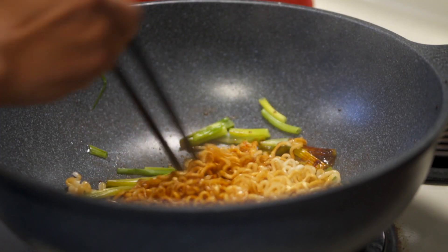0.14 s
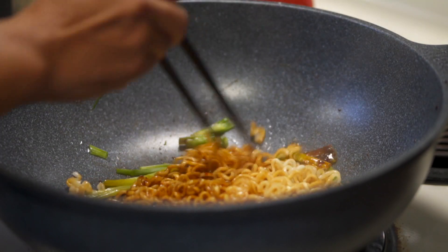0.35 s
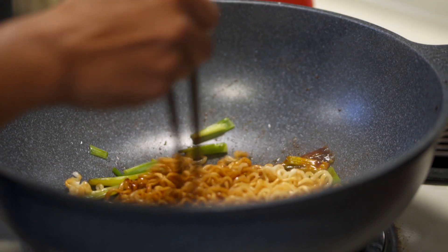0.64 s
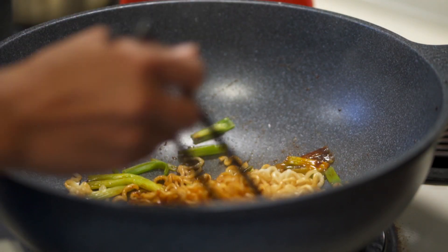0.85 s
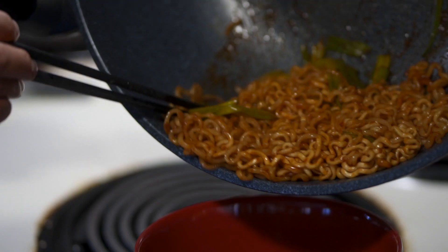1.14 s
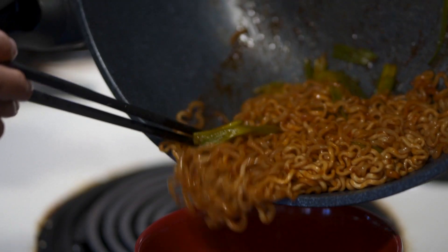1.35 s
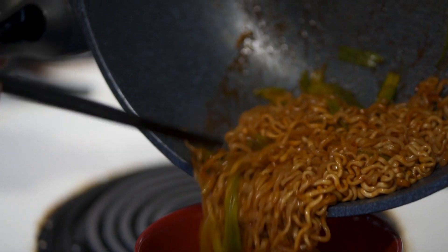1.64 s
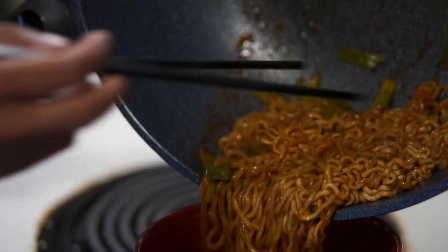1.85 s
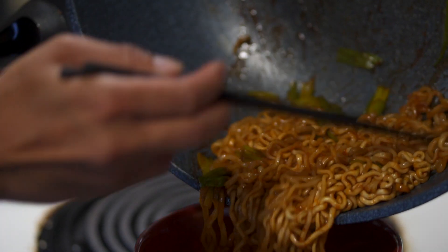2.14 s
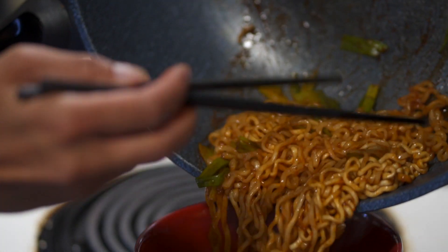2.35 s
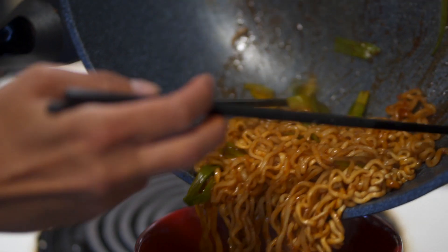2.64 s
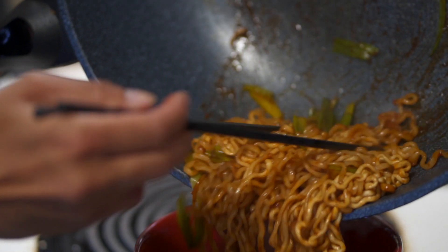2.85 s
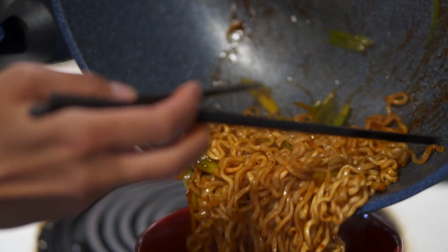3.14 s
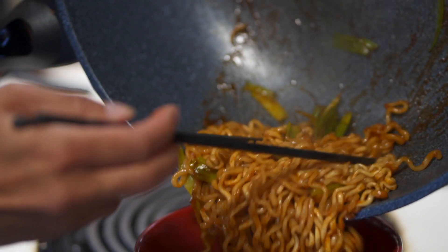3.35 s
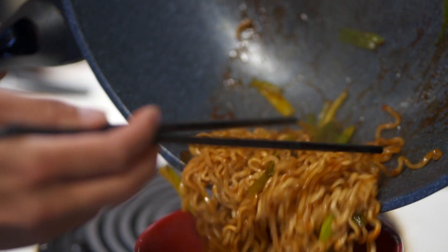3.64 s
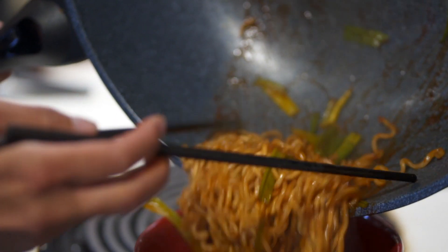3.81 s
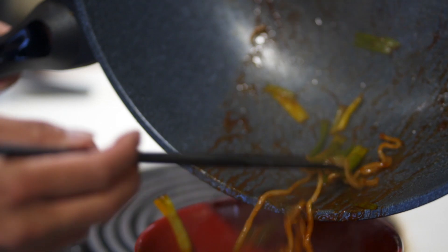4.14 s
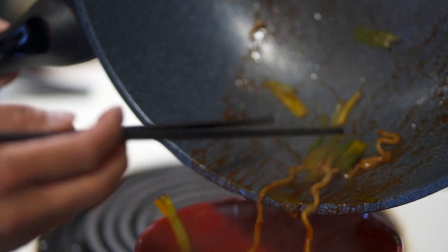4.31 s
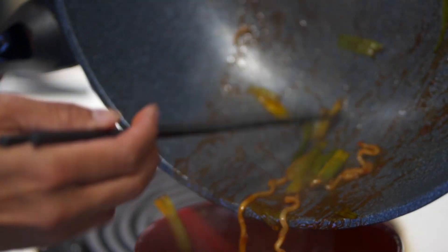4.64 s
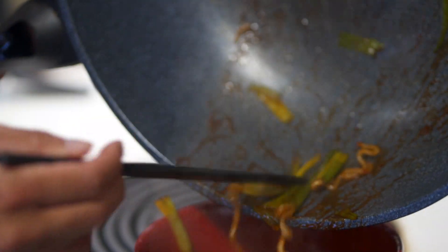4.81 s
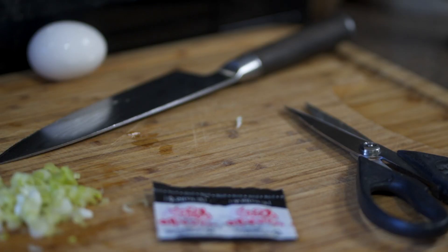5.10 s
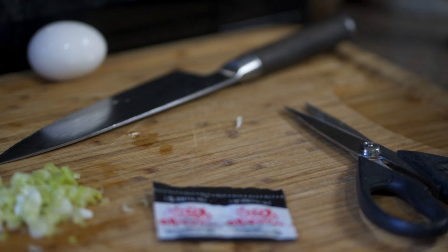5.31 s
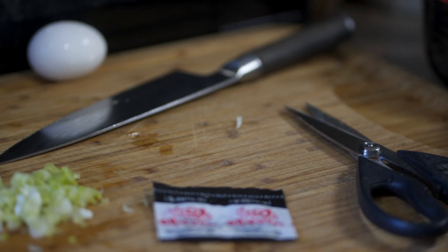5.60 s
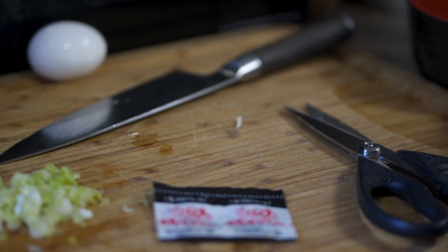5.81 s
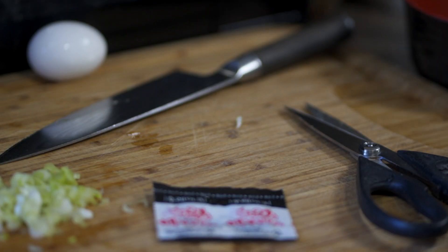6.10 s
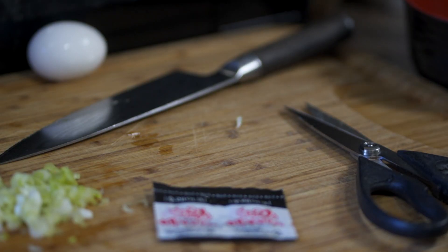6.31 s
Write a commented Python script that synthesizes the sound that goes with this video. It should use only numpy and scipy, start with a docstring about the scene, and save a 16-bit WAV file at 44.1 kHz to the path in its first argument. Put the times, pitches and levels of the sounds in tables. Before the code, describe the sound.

Close in a home kitchen, chopsticks clack sharply and scrape through wet noodles in a coated wok over a thin spitting sizzle. A hard cut drops the hiss; spaced taps and gritty drags ring more freely on the bare pan. Another cut leaves soft cloth brushes, then a bowl knocks and slides briefly on a wooden board. Low hum throughout; the loudest taps distort.

```python
"""Home kitchen: chopsticks tap and scrape a coated wok of noodles, in three parts joined by hard cuts.
Stirring over the heat: spitting hiss, and struck and rubbed pan modes damped by the food.
Tipping the food out: the same pan rings more freely. Then a bowl is set down and slid on a wooden board,
its knocks and grit driving board and rim modes, with soft brushes of hands and cloth.
Room air and a wavering fridge hum lie beneath; loud taps clip the microphone."""
import sys
import numpy as np
from scipy import signal
from scipy.fft import rfft, irfft, next_fast_len
from scipy.io import wavfile
from scipy.ndimage import uniform_filter1d

SR = 44100
rng = np.random.default_rng(int(sys.argv[2]) if len(sys.argv) > 2 else 0)


def master_out(mix):
    """Clip the mix to full scale and print it as 16-bit PCM to the path in sys.argv[1]."""
    frames = np.transpose(np.atleast_2d(mix))
    ceiling = np.clip(frames, -1, 1)
    pcm = np.round(ceiling * 32767).astype(np.int16)
    wavfile.write(sys.argv[1], SR, pcm)


def invert_db(x):
    """Field ratio 10**(x/20) for x, a level in decibels (scalar or array-like)."""
    u = np.asarray(x, float) / 20
    return 10 ** u


N = 284886
T = np.arange(N) / SR

# Bounds of the three parts. Each entry: time in seconds.
CUTS_S = [0, 1.135, 4.931, 7]

# Chopstick taps on the wok. Each row: start in seconds, relative level in dB, favoured mode in Hz,
# share under 1.5 kHz in dB.
WOK_TAPS = [(0.149, -12.5, 5240, -38), (0.1586, 2.5, 5770, -50), (0.182, -12, 3820, -29),
            (0.318, -29, 3040, -9), (0.376, -0.5, 5380, -11.5), (0.426, -8, 3100, -11.5),
            (0.4887, -22.5, 2374, 2), (0.5288, -15, 5350, -12), (0.681, 3.5, 6285, -19.5),
            (0.8162, -18, 9300, -6), (0.9331, 0, 3900, -13.5), (1.167, -26.5, 6848, -14),
            (1.352, -40, 9722, -28), (1.368, -16, 12440, -14), (1.8212, -30, 9780, -3),
            (1.88, -21.5, 6285, -20.5), (1.9422, -43, 2480, 5.5), (2.1816, -16, 5222, -14.5),
            (2.2036, -18.5, 7260, -15.5), (2.451, -49, 12440, -24.5), (2.5096, -37.5, 6285, -6.5),
            (2.7283, -3, 3040, -24), (3.137, -18.5, 7260, -21), (3.2034, -4, 6285, -21.5),
            (3.2825, -3.5, 3040, -27.5), (3.7668, -13.5, 4290, -17), (3.905, 1, 3820, -22),
            (3.9421, -5.5, 5380, -18), (4.1188, -26.5, 3600, -9), (4.519, -26, 3600, -14),
            (4.663, 1.5, 5900, -22.5), (4.679, -2.5, 5717, -45)]
# Chopsticks dragging on the wok. Each row: start in seconds, length in seconds, fade t60 in seconds,
# relative level in dB, favoured mode in Hz, share under 1.5 kHz in dB.
WOK_SCRAPES = [(0, 0.0094, 0.11, -31, 6540, -6), (0.179, 0.019, 0.22, -12, 3040, -13),
               (0.392, 0.019, 0.038, -21.5, 2070, -0.5), (0.412, 0.025, 0.17, -21, 2374, -5),
               (0.509, 0.02, 0.04, -23, 5717, -3), (0.705, 0.048, 0.13, -10, 2180, -12.5),
               (0.932, 0.037, 0.99, -32.5, 3950, -10.5), (1.16, 0.024, 0.05, -30.5, 8500, -26),
               (1.367, 0.016, 0.07, -37, 6310, -13), (2.172, 0.045, 0.05, -33.5, 10660, -19),
               (2.734, 0.1, 0.1, -21.5, 2480, -15), (2.815, 0.032, 0.065, -30.5, 770, -16.5),
               (3.233, 0.025, 0.11, -26.5, 3600, -6), (3.274, 0.014, 0.22, -24, 2374, -9),
               (3.761, 0.022, 0.11, -18, 5380, -20), (3.967, 0.044, 0.027, -17.5, 1563, -16.5),
               (4.02, 0.055, 0.075, -37, 5380, -21.5), (4.68, 0.04, 0.36, -7, 2374, -18)]
# Modes of the pan. Each row: frequency in Hz, level in dB, undamped t60 in seconds,
# change of level while food lies in it in dB.
WOK_MODES = [(771, -4.5, 0.48, 0), (926, -3.5, .04, 2), (1400, -2.5, 0.25, -3), (1563, -9.5, .12, -1),
             (2125.8, -16, 0.2, 17), (2374, -4, 0.13, -7), (2480, -14, 0.27, -5), (3040, -3, 0.15, 7),
             (3600, -4, 0.14, -6), (3950, -5, 0.22, 8), (3820, -11, 0.1, -15.5), (4410, -9, 0.14, -6),
             (5222, -21, 0.6, 6), (5380, -11.5, 0.1483, 0), (5717, -13, 0.2, 6), (6285, -17.5, 0.12, -1),
             (6848, -18, 0.3, 0), (7267, -17, 0.36, 2.5), (8565, -15, 0.16, -0.5), (9722, -17, .15, -0.5),
             (10750, -14, .11, -3), (11455, -18, .17, -3), (12440, -20, .13, -3)]
# Share of the ring time left by the food. Each entry: ratio, one per part (last unused).
WOK_DAMP_RATIO = [.2, .85, .85]
# Spectrum of a tap's crack. Each row: frequency in Hz, level in dB.
CRACK_SPECTRUM = [(500, -47.5), (900, -25), (2000, -29), (3860, 12.5), (4870, 2.5), (6140, 14), (8090, 4),
                  (11000, 3), (16000, -20)]
# Spectrum of the drag. Each row: frequency in Hz, level in dB.
RUB_SPECTRUM = [(1200, -21.5), (2000, -5), (3500, 6.5), (5400, 4.5), (8000, 8), (11000, -6.5),
                (16000, -36.5)]
# Low noise of taps and drags. Each row: frequency in Hz, level in dB.
LOW_SPECTRUM = [(200, -30.5), (600, -1.5), (1500, -3.0), (2400, -5.5), (3500, -14.5)]
# Scraping heard straight from the tips, more with food to crunch. Each entry: level in dB, wok parts 1 and 2.
TIP_GRIT_DB = [-9, -17]
# Wet food crunches coarsely, the bare coating finely. Each entry: grains per second, wok parts 1 and 2.
GRAIN_RATE_PER_S = [3500, 9000]
# How unevenly a drag bites, wet food then bare pan. Each entry: spread in dB, wok parts 1 and 2.
BITE_DB = [5, 3]
# Where the close upper modes begin, lower while food loads the pan. Each entry: Hz, one per part (last unused).
CROWD_START_HZ = [1500, 4300, 4300]
CROWD_T60_S = .2  # at 5 kHz, before scatter and damping
TICKS_PER_S, TICK_DB, TICK_LOW_DB = 2, -47, -10  # faint stray ticks of the tips; levels scatter round these
LINGER_DB, LINGER_T60_S = -19, 0.82  # food keeps shifting softly after each drag
# the tips rest against the pan and choke its modes between these times
STILLED_START_S, STILLED_END_S, STILLED_T60_S = 4.12, 4.5, .12
SOFT_RISE_S = .002  # build-up of a crack at -20 dB; harder ones rise faster
# lead of the favoured mode on a 0 dB tap, growth per dB of level, level below which there is none
LIFT_DB, LIFT_PER_DB, GLANCING_DB = 6, -.45, -35
WET_TREBLE_DB = -8  # wet food dulls a drag from 5 kHz, fully by 9 kHz

# Frying level. Each row: time in seconds, level in dB.
SIZZLE_LEVEL = [(0, -36), (.35, -36), (.65, -34), (.9, -31), (1.133, -39)]
# Frying spectrum. Each row: frequency in Hz, level in dB.
SIZZLE_SPECTRUM = [(200, -27), (430, -9), (700, -4), (1410, -11), (3130, -4), (7200, -2.5), (10900, -6),
                   (16000, -20)]

# Bowl knocks on the board. Each row: start in seconds, relative level in dB, sharpness in dB,
# favoured mode of the bowl in Hz.
BOWL_KNOCKS = [(5.62, 8.5, -5, 2245), (5.637, 2, -8, 4720), (5.711, -0.5, -29, 2880),
               (5.802, -7.5, -9.5, 3230), (5.857, 1.5, -7.5, 2245), (5.866, -8.5, -19, 3300)]
# Bowl sliding and rocking. Each row: time in seconds, pressure in dB, level of the treble grit in dB.
BOWL_SLIDE = [(5.62, -16.5, -44), (5.66, -13.5, -19.5), (5.726, -16.5, -21), (5.76, -31.5, -29.5),
              (5.82, -11, -26), (5.843, -35, -51), (5.872, -13.5, -36), (5.943, -37.5, -33),
              (6.0, -70, -85)]
# Modes of the board. Each row: frequency in Hz, level in dB, t60 in seconds.
BOARD_MODES = [(81.8, -15, 0.013), (150, -10.5, 0.166), (266, -9, 0.1), (340, 7.5, 0.012), (488, 2, 0.033),
               (608, 1.5, 0.021), (670, -4, 0.086), (733, 4.5, 0.033), (890, -4, 0.038), (1060, -20, 0.039)]
# Modes of the bowl's rim. Each row: frequency in Hz, level in dB, t60 in seconds.
BOWL_MODES = [(2245, -4, 0.03), (2880, -12, 0.08), (3300, 0, 0.04), (4720, -3, 0.04), (5396, -8, 0.08),
              (6370, -13, 0.05)]
THUD_DB = 3.5  # rubbing of the board's modes under 300 Hz against the others

# Hands and cloth near the board. Each row: start in seconds, relative level in dB, low share in dB.
BRUSHES = [(4.9974, -39, -17), (5.1244, -34.5, -13), (5.3043, -38.5, 6.5), (5.4355, -34.5, 8.5),
           (5.4883, -51, 20), (6.129, -31, -23), (6.1994, -34, -17), (6.2994, -37, -6)]
BRUSHES_PER_S, BRUSH_DB, BRUSH_LOW_DB = 5, -42, -15  # fainter ones at random; levels scatter round these

# Dull bumps through stove and counter. Each row: start in seconds, relative level in dB, frequency in Hz.
DULL_BUMPS = [(0.39, -2, 311), (0.431, 2, 150), (0.498, -4.5, 243.4), (5.314, -4, 130), (6.082, -13, 85.4)]

# Room air, one list for the stove side and one for the board side. Each row: frequency in Hz, level in dB.
AIR_SPECTRA = [
    [(15, -48.5), (25, -28.5), (43, -33), (114, -7), (145, -7.5), (223, -9), (242, -9), (384, -11),
     (754, -24.5), (1040, -24), (1840, -33), (5280, -37), (16000, -45)],
    [(15, -48), (25, -12), (80, -3.5), (236, 5), (293, -20.5), (354, -9.5), (1100, -21.5), (1290, -19.5),
     (1520, -24.5), (5280, -25.5), (11300, -32), (16000, -39)],
]
# Mean air level. Each entry: dB, stove side then board side.
AIR_LEVEL_DB = [-47, -43]
# Fridge hum. Each row: frequency in Hz, then mean level in dB in parts 1, 2 and 3.
FRIDGE_HUM = [(58.3, -56, -56, -54.5), (109.8, -54, -54.5, -55), (219.3, -48, -46, -38),
              (328, -69, -63, -58.5), (1034, -63.5, -66.5, -70.5), (3950, -74, -75.5, -72)]
ROOM_T60_S, ROOM_DB = 0.42, -11.5


def wok(k):
    """Taps crack and strike the pan's modes; the drag is grit heard mostly through the pan."""
    taps = wok_taps(k)
    start_s, tap_db, spot_hz, low_db = taps
    size = invert_db(tap_db)
    scrapes = np.array([row for row in WOK_SCRAPES if CUTS_S[k] <= row[0] < CUTS_S[k + 1]]).T
    length_s, t60_s, drag_db, drag_hz, deep_db = scrapes[1:]
    pressure = strokes(scrapes[0], length_s, t60_s) * invert_db(BITE_DB[k] * walk(90))
    rub = wok_rub(k, pressure, drag_db, drag_hz)

    crack = invert_db(-7.5) * cracks(start_s, size, spot_hz)
    thud = invert_db(-6.0) * fade(spikes(start_s, size * invert_db(low_db)), 0.09) * noise(LOW_SPECTRUM)
    low_grit = unit(colour(grit(5400, 0.98), LOW_SPECTRUM))
    low_rub = invert_db(4.0) * low_grit * (invert_db(drag_db + deep_db) @ pressure)
    direct_rub = invert_db(TIP_GRIT_DB[k]) * (colour(rub, RUB_SPECTRUM) + low_rub)
    crowd_drive = invert_db(-56.0) * rub + invert_db(-30.5) * spikes(start_s, size ** 1.33)
    upper_ring = signal.fftconvolve(crowd_drive, crowd(k, count=240))[:N]
    modes = wok_modes(k, taps, pressure, drag_db, drag_hz, deep_db)
    return crack + thud + direct_rub + upper_ring + modes


def wok_taps(k):
    """Columns of the listed taps of this part and of faint ticks anywhere on the pan."""
    at_s, loud, place, deep = strays(CUTS_S[k], CUTS_S[k + 1], TICKS_PER_S)
    tick_db = TICK_DB + 8 * (loud - .5)
    tick_low_db = TICK_LOW_DB - 16 * (deep - .5)
    ticks = np.transpose([at_s, tick_db, 2400 * 4 ** place, tick_low_db])
    listed = [row for row in WOK_TAPS if CUTS_S[k] <= row[0] < CUTS_S[k + 1]]
    return np.vstack([listed, ticks]).T


def cracks(start_s, size, spot_hz):
    """A noise burst per tap, shorter when light, lifted in a wide band about the spot struck."""
    out = np.zeros(N + 4096)
    t = T[:4096]
    f = np.arange(2049) * SR / 4096 + 1
    stick_hz, stick_db = np.transpose(CRACK_SPECTRUM)
    base_db = np.interp(np.log(f), np.log(stick_hz), stick_db)
    for at_s, gain, hz in zip(start_s, size, spot_hz):
        shape = invert_db(base_db + 10 * np.exp(-(np.log(f / hz) / 0.97) ** 2))
        burst = unit(irfft(rfft(rng.standard_normal(len(t))) * shape))
        decay = invert_db(-60 * t / (0.049 * gain ** 0.16))
        rise = np.minimum(t * 10 * gain / SOFT_RISE_S, 1)
        out[int(at_s * SR):][:len(t)] += gain * burst * decay * rise
    return out[:N]


def strokes(start_s, length_s, t60_s):
    """One envelope a row: swells, holds for its length, dies away and leaves a soft remainder."""
    t = T - start_s[:, None]
    after = np.maximum(t - length_s[:, None], 0)
    swell = np.clip(t / (.2 * length_s[:, None]), 0, 1)
    linger = invert_db(LINGER_DB - 60 * after / LINGER_T60_S)
    return swell * np.maximum(invert_db(-60 * after / t60_s[:, None]), linger)


def wok_rub(k, pressure, drag_db, drag_hz):
    """Friction grains gated by each stroke, slightly duller below one and a half times the spot's pitch."""
    grains = grit(GRAIN_RATE_PER_S[k], 2.1)
    rub = np.zeros(N)
    for push, level_db, hz in zip(pressure, drag_db, drag_hz):
        rub += invert_db(level_db) * colour(grains * push, [(hz * 1.5, -2), (hz, 5), (hz * 2.0, 0)])
    return colour(rub, [(5000, 0.0011), (9000, WET_TREBLE_DB * (k == 0))])


def wok_modes(k, taps, pressure, drag_db, drag_hz, deep_db):
    """Each pan mode is a decaying resonator struck by the taps and driven by friction near its pitch."""
    start_s, tap_db, spot_hz, low_db = taps
    size = invert_db(tap_db)
    lift_db = (LIFT_DB + LIFT_PER_DB * tap_db) * (tap_db > GLANCING_DB)
    stilled = (T > STILLED_START_S) * (T < STILLED_END_S)
    free = invert_db(-60 * (T - STILLED_START_S) / STILLED_T60_S * stilled)
    out = np.zeros(N)
    for hz, mode_db, ring_s, loaded_db in WOK_MODES:
        bass = hz < 1600
        # light ticks hardly move the heavy lower modes
        weight = size ** (1.3 if hz < 4700 else .8) * invert_db(.6 * bass * low_db)
        weight = weight * favour(spot_hz, hz, lift_db, WOK_MODES)
        blow = invert_db(-22 - 2 * bass) * spikes(start_s, weight)
        # friction at the mode's own pitch, its phase wandering more for high modes
        wander = hz / 900 * walk(60 / WOK_DAMP_RATIO[k] ** .5)
        force = np.sin(2 * np.pi * hz * T + wander)
        share = invert_db(drag_db + bass * deep_db) * favour(drag_hz, hz, 7.3, WOK_MODES)
        push = invert_db(-67.5 + 12.9 * bass) * share @ pressure
        level = invert_db(mode_db + loaded_db * (k == 0))
        out += free * level * ring(blow + push * force, hz, ring_s * WOK_DAMP_RATIO[k])
    return out


def favour(spot_hz, hz, lift_db, modes):
    """Each point of contact drives its own mix of modes, lifting the one nearest its spot."""
    modes_hz = np.array(modes)[:, 0]
    nearest_hz = modes_hz[np.abs(spot_hz[:, None] - modes_hz).argmin(axis=1)]
    scatter_db = 1.8 * rng.standard_normal(len(spot_hz))
    return invert_db(lift_db * (nearest_hz == hz) + scatter_db)


def crowd(k, count):
    """Impulse response of the dense upper modes; higher ones tend to die sooner."""
    t = T[:SR // 3]
    place, scatter = rng.random((count, 2)).T
    hz = CROWD_START_HZ[k] + 9000 * place ** 1.3
    t60_s = WOK_DAMP_RATIO[k] ** .5 * CROWD_T60_S * (5000 / hz) * (.7 + .6 * scatter)
    rub_hz, rub_db = np.transpose(RUB_SPECTRUM)
    gain = invert_db(np.interp(np.log(hz), np.log(rub_hz), rub_db)) * rng.choice([-1, 1], count)
    return unit(gain @ (np.sin(2 * np.pi * hz[:, None] * t) * invert_db(-60 * t / t60_s[:, None])))


def sizzle():
    """Oil and water spit: hiss with small pops, flickering in level."""
    time_s, level_db = np.transpose(SIZZLE_LEVEL)
    pops = unit(colour(grit(4090, 0.5), SIZZLE_SPECTRUM))
    level = invert_db(np.interp(T, time_s, level_db) + 1.5 * walk(20))
    return level * unit(noise(SIZZLE_SPECTRUM) + .7 * pops)


def bowl():
    """Knocks and a rough slide drive the board's resonances; the bowl's rim rings on top."""
    start_s, knock_db, sharp_db, spot_hz = np.transpose(BOWL_KNOCKS)
    at_s, pressure_db, grit_db = np.transpose(BOWL_SLIDE)
    sliding = (T > at_s[0]) * (T < at_s[-1])
    body = invert_db(np.interp(T, at_s, pressure_db) + 3 * walk(90)) * sliding
    sand = invert_db(np.interp(T, at_s, grit_db) + 3 * walk(90)) * sliding

    clack = noise([(800, -11.0), (2200, 10.5), (3500, 4.0), (8000, -5.5), (16000, -37.5)])
    out = invert_db(1.0) * fade(spikes(start_s, invert_db(knock_db + sharp_db)), 0.013) * clack
    thud = noise([(300, 3.0), (700, 13.5), (2400, -3), (4000, -40.5)])
    out += invert_db(-8.0) * fade(spikes(start_s, invert_db(knock_db)), 0.035) * thud
    fine = sand * grit(3000, 2.2)
    out += colour(fine, [(800, 9.5), (2000, 0.5), (5000, -2), (9000, -15.5), (16000, -37.0)])

    rub = grit(1500, 2.0)
    for hz, mode_db, t60_s in BOARD_MODES:
        # no favoured board mode, only scatter
        blow = invert_db(-23.0) * spikes(start_s, invert_db(knock_db) * favour(start_s, hz, 0, BOARD_MODES))
        push = invert_db(-31.0) * invert_db(THUD_DB * (hz < 300)) * body * rub
        out += invert_db(mode_db) * ring(push + blow, hz, t60_s)
    for hz, mode_db, t60_s in BOWL_MODES:
        weight = invert_db(knock_db + sharp_db) * favour(spot_hz, hz, 8, BOWL_MODES)
        blow = invert_db(-28.5) * spikes(start_s, weight)
        out += invert_db(mode_db) * ring(invert_db(-33) * fine + blow, hz, t60_s)
    # the small board radiates little under its lowest mode
    return signal.sosfilt(signal.butter(4, 74, "high", fs=SR, output="sos"), out)


def rustle():
    """Short soft brushes: decaying high and low noise, listed and stray."""
    at_s, loud, deep, _ = strays(CUTS_S[2], T[-1], BRUSHES_PER_S)
    faint_db = BRUSH_DB + 6 * (loud - .5)
    faint_low_db = BRUSH_LOW_DB + 10 * (deep - .5)
    faint = np.transpose([at_s, faint_db, faint_low_db])
    start_s, brush_db, low_db = np.vstack([BRUSHES, faint]).T
    high_noise = noise([(1200, -6), (3500, 1.5), (7000, -2), (16000, -26.5)])
    low_noise = noise([(400, -42), (700, 4), (2000, 0.0), (3000, -24)])
    high = fade(spikes(start_s, invert_db(brush_db)), 0.2) * high_noise
    low = fade(spikes(start_s, invert_db(brush_db + low_db)), 0.036) * low_noise
    return invert_db(-14) * (high + low)


def bumps():
    """A soft push, one cycle long, into one low, quickly damped resonance."""
    out = np.zeros(N)
    for start_s, bump_db, hz in DULL_BUMPS:
        push = np.hanning(int(SR / hz)) * 2 * hz / SR
        thump = ring(spikes([start_s], 0.126), hz, 0.076)
        out += invert_db(bump_db) * np.convolve(thump, push)[:N]
    return out


def kitchen(k):
    """Air noise of this side of the room and the hum, wavering in phase and level."""
    side = k // 2
    out = invert_db(AIR_LEVEL_DB[side] + .5 * walk(4)) * noise(AIR_SPECTRA[side])
    for hz, *hum_db in FRIDGE_HUM:
        phase = 2 * np.pi * hz * T + 0.72 * walk(15)
        out += np.sqrt(2) * invert_db(hum_db[k] + 0.32 * walk(25)) * np.sin(phase)
    return out


def room(x):
    """Near sound plus a short dull kitchen tail of decaying noise."""
    t = T[:SR // 2]
    decay = np.exp(-np.log(1000) * t / ROOM_T60_S)
    tail = rng.standard_normal(len(t)) * decay * np.minimum(t / 0.0049, 1)
    tail = signal.lfilter([1], [1, -.45], tail)
    return x + invert_db(ROOM_DB) * signal.fftconvolve(x, tail / np.linalg.norm(tail))[:N]


def unit(x):
    """Scale to an rms of 1."""
    return x / np.sqrt(np.mean(x ** 2) + 1e-18)


def colour(x, points):
    """Weight the spectrum by (Hz, dB) points."""
    hz, db = np.transpose(points)
    size = next_fast_len(N)
    f = np.arange(size // 2 + 1) * SR / size + 1
    return irfft(rfft(x, size) * invert_db(np.interp(np.log(f), np.log(hz), db)), size)[:N]


def noise(points):
    """Steady noise of the given spectrum, rms 1."""
    return unit(colour(rng.standard_normal(N), points))


def ring(x, hz, t60_s):
    """One mode; a unit impulse gives a decaying sine."""
    r, w = np.exp(-np.log(1000) / (t60_s * SR)), 2 * np.pi * hz / SR
    return signal.lfilter([0, np.sin(w)], [1, -2 * r * np.cos(w), r * r], x)


def fade(x, t60_s):
    """Each impulse becomes an envelope that dies away."""
    return signal.lfilter([1], [1, -np.exp(-np.log(1000) / (t60_s * SR))], x)


def spikes(times_s, sizes):
    """Impulses of the given sizes."""
    x = np.zeros(N)
    np.add.at(x, (np.asarray(times_s) * SR).astype(int), sizes)
    return x


def walk(rate):
    """Random levels held 1 / rate s and slewed twice; spread near 1."""
    k = int(SR / rate)
    held = np.repeat(rng.standard_normal(N // k + 1), k)
    return 1.3 * uniform_filter1d(uniform_filter1d(held, k), k)[:N]


def grit(rate, spread_db):
    """Dense clicks of very unequal size, rms 1."""
    clicks = (rng.random(N) < rate / SR) * rng.standard_normal(N)
    return unit(clicks * invert_db(spread_db * rng.exponential(size=N)))


def strays(start_s, end_s, rate):
    """Columns of chance for scattered small events: a time, then three shares 0-1."""
    rows = rng.random((int(rate * (end_s - start_s)), 4))
    return start_s + (end_s - start_s) * rows[:, 0], *rows[:, 1:].T


def part(k):
    """Gate that is open during part k."""
    return (T >= CUTS_S[k]) & (T < CUTS_S[k + 1])


def scene():
    """Three parts in turn, with the bumps throughout."""
    near = [wok(0) + sizzle(), wok(1), bowl() + rustle()]
    out = bumps()
    for k in range(3):
        # each cut chops the ring of the part before it
        out += part(k) * (room(near[k]) + kitchen(k))
    return out[None]


def roll_off(x):
    """The treble ends steeply here."""
    return signal.sosfilt(signal.butter(12, 16850, fs=SR, output="sos"), x)


def record(dry):
    """The input clips on the hardest taps; top and lowest bass are cut."""
    low_pass = signal.ellip(8, .2, 25, 15950, fs=SR, output="sos")
    high_pass = signal.butter(2, 45, "high", fs=SR, output="sos")
    filtered = signal.sosfilt(np.vstack([low_pass, high_pass]), np.clip(dry, -1, 1))
    return roll_off(np.clip(filtered, -1, 1))


dry = scene()
out = record(dry)
master_out(out)
```